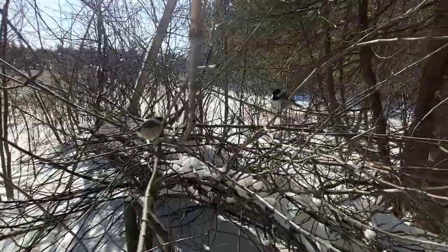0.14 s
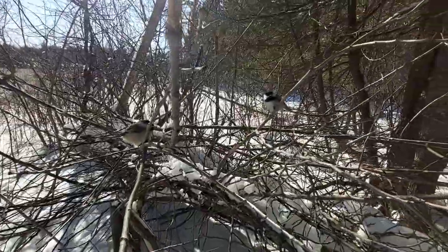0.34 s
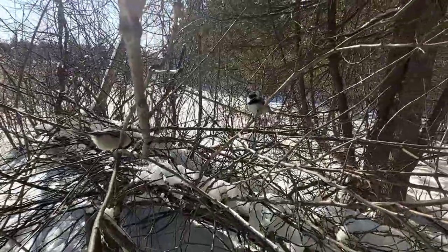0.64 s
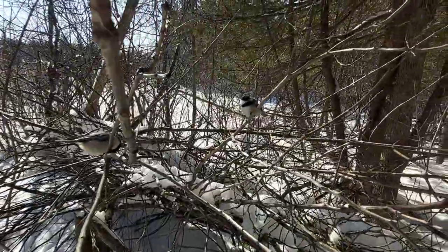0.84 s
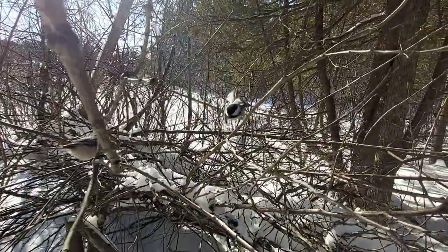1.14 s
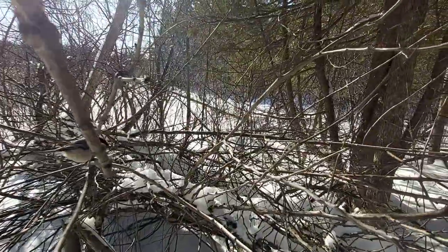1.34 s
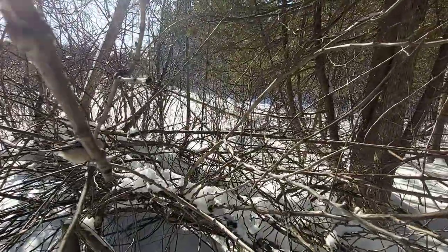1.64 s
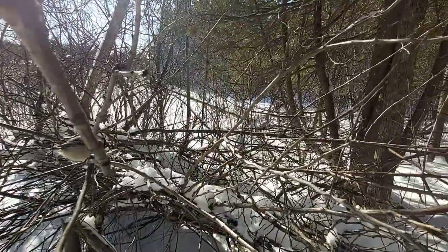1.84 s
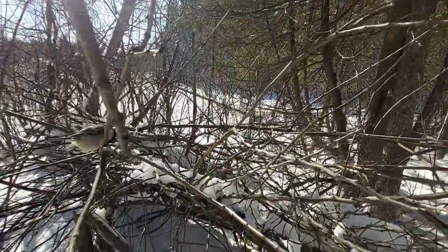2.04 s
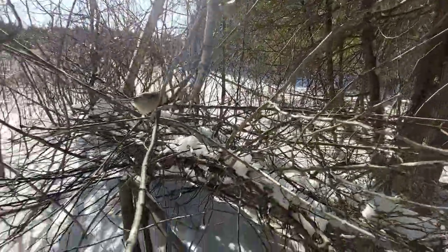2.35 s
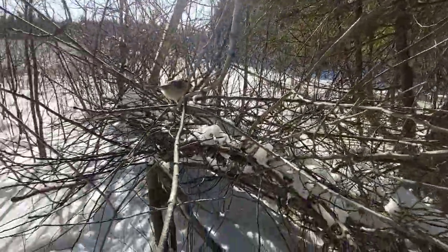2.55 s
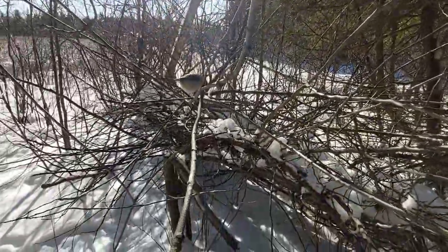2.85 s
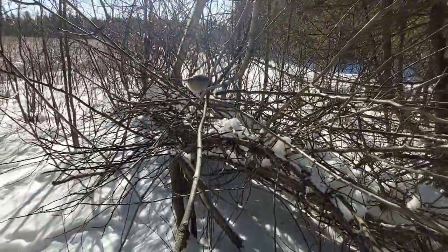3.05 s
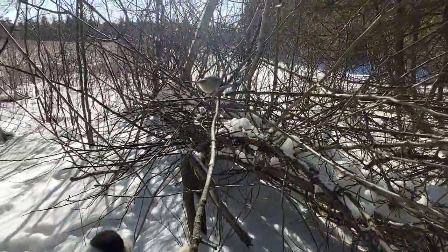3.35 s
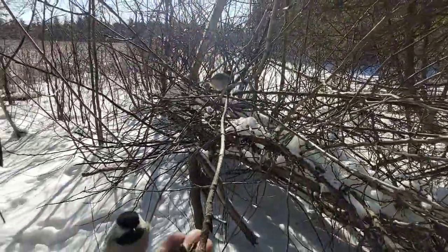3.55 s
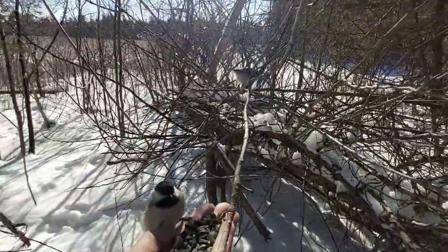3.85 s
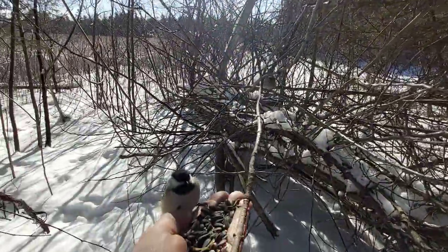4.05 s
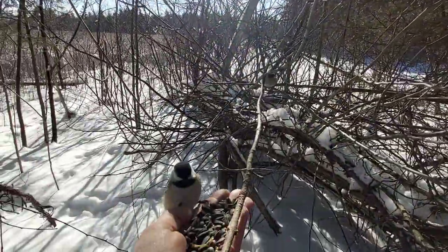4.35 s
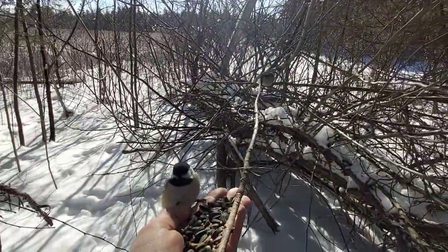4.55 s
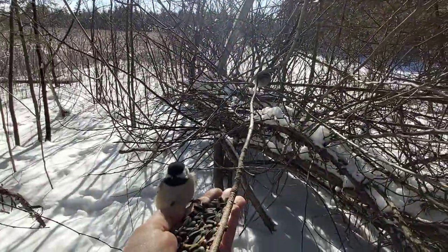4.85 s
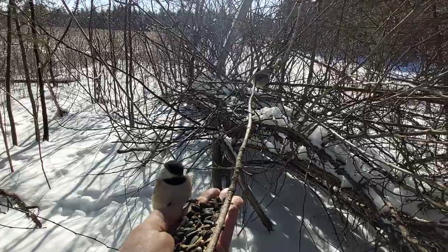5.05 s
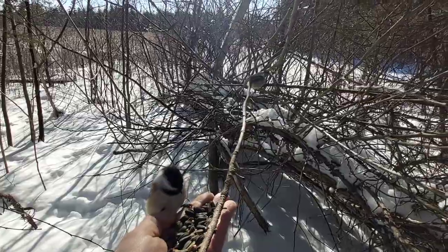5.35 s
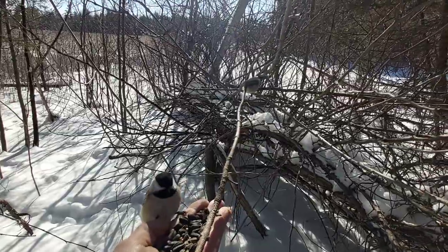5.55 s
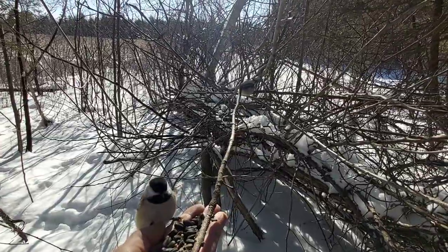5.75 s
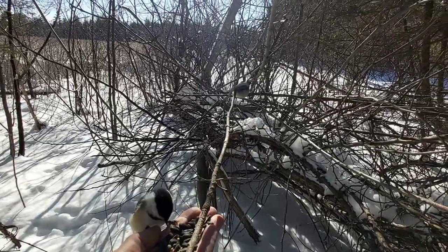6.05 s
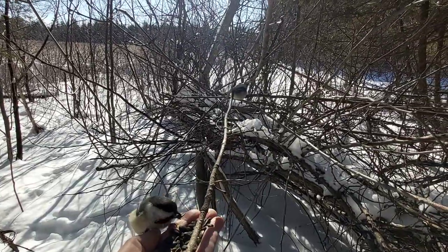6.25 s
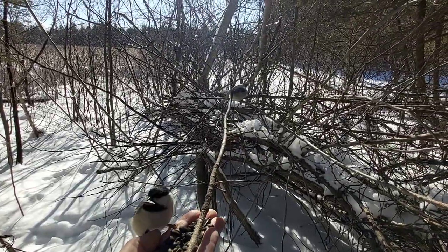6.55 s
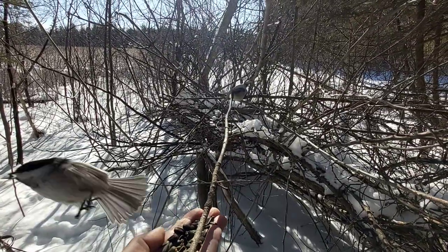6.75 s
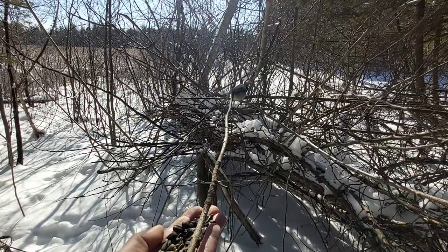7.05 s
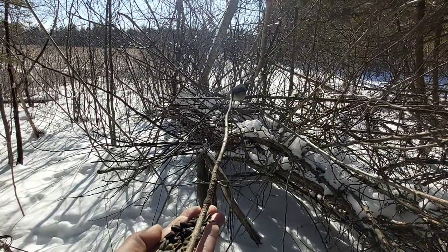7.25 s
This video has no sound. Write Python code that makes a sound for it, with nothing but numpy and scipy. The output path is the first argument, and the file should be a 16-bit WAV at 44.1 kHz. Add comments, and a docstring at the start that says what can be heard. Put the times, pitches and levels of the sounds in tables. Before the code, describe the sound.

Over a faint outdoor hush, small birds chirp sparsely and very high. Wings whisk by with brushy rustling and crackly ticks, ending in a sudden bassy draught thump on the left. Then a short flutter at landing, weak buzzy notes, light clicks among seeds, long near-quiet, and finally a brisk purring burst of wingbeats as the bird takes off. Close stereo handheld microphone, slight echo from trees.

```python
"""Small birds chirp, call and flutter in winter brush around a hand-held two-port microphone.
The voices are gliding whistles and pulsed buzzes; each wingbeat is a damped swing over stirred air.
Twigs, claws and husks tick as short noise bursts, and feathers and brush rustle as grainy hiss.
The draught of one wing thumps into the left port as a chirped ring.
Behind it all lies the far hush of a snowy wood, in slowly swelling noise."""
import sys
import numpy as np
from scipy import signal
from scipy.fft import rfft, irfft
from scipy.io import wavfile
from scipy.ndimage import uniform_filter1d

SR = 44100
rng = np.random.default_rng(int(sys.argv[2]) if len(sys.argv) > 2 else 0)


def digitize_waveform(pressure):
    """Quantize a signal to 16-bit integers and store it at the path in sys.argv[1].

    Rows of a 2-D input are taken as channels; values are limited to [-1, 1].
    """
    field = np.atleast_2d(pressure).T
    bounded = np.clip(field, -1, 1)
    quanta = np.round(bounded * 32767).astype(np.int16)
    wavfile.write(sys.argv[1], SR, quanta)


N = 325899  # length in samples


def gain_of(db):
    """Amplitude factor of a level in dB."""
    return 10 ** (np.asarray(db) / 20)


def evened(x):
    """Signal scaled to an rms of 1."""
    return x / np.sqrt(np.mean(x ** 2) + 1e-20)


def read_curve(points, hz):
    """Value of a table of (Hz, value) points, interpolated over log frequency."""
    point_hz, value = np.transpose(points)
    return np.interp(np.log(hz + 1), np.log(point_hz + 1), value)


def ramp(hz, lo_hz, hi_hz):
    """Straight climb from 0 at lo_hz to 1 at hi_hz."""
    return np.clip((hz - lo_hz) / (hi_hz - lo_hz), 0, 1)


def swell(share, peak, start_db, end_db):
    """Level in dB that climbs from start_db to 0 at the share peak, then runs to end_db."""
    return np.interp(share, [0, np.clip(peak, .02, .98), 1], [start_db, 0, end_db])


def sides(pan_db):
    """Gains of the two ports for a left-minus-right level, their mean being 1."""
    left = gain_of(pan_db)
    return np.array([2 * left / (1 + left), 2 / (1 + left)])


def add(mix, start_s, sound):
    """Lay a two-port sound into the mix, cut off at the end of the scene."""
    part = mix[:, round(start_s * SR):][:, :sound.shape[1]]
    part += sound[:, :part.shape[1]]


def unfold(rows):
    """Start time and sample-rate columns of a curve table."""
    s, *columns = np.transpose(rows)
    t = np.arange(s[0], s[-1], 1 / SR)
    return s[0], [np.interp(t, s, column) for column in columns]


def noise(colour, lo_hz, hi_hz, lift=lambda hz, t: 0, patchy_db=1., size=256):
    """Two-port noise in drifting patches, rms near 1 from lo_hz to hi_hz; lift(hz, t) colours it in dB."""
    # Likeness of the two ports. Each row: frequency in Hz, share of the left noise in the right (0-1)
    likeness = [(60, 0.7), (300, 0.97), (1400, 0.47), (2500, 0.11), (5000, 0.14), (15000, .1)]
    right_lag_s = 3.5e-4
    hop = size // 4
    frames, hz = N // hop + 5, np.fft.rfftfreq(size, 1 / SR)
    a, b, c, d, patches = rng.standard_normal((frames, len(hz), 5)).T
    patches = uniform_filter1d(patches, size=5, axis=0)  # smooth over frequency
    patches = evened(uniform_filter1d(patches, size=12, axis=1))  # and over time

    same = np.clip(read_curve(likeness, hz), 0, 1)[:, None]
    lag = np.exp(-2j * np.pi * hz * right_lag_s)[:, None]
    left = a + 1j * b
    right = lag * same * left + np.sqrt(1 - same ** 2) * (c + 1j * d)

    shape = gain_of(read_curve(colour, hz))
    shape = shape / np.linalg.norm(shape[(hz >= lo_hz) & (hz < hi_hz)])
    lift_db = lift(hz[:, None], np.arange(frames) * hop / SR)
    spectrum = np.array([left, right]) * shape[:, None] * gain_of(lift_db + patchy_db * patches)
    return signal.istft(spectrum, nperseg=size, noverlap=size - hop)[1][:, :N]


def hush():
    """Far wind in the trees and the hiss of the microphone; the bass swells on its own."""
    # Colour of wind and hiss. Each row: frequency in Hz, spectral level in dB per Hz
    hush_colour = [(15, -53), (25, -23), (118, -1), (288, -0.5), (483, -5), (831, -7), (979, -7),
                   (1320, -17.5), (1730, -24.5), (4730, -36.5), (6380, -27), (7510, -41.5), (11900, -32),
                   (15200, -40.5), (16500, -33)]
    # Slow swelling of the wind. Each row: time in seconds, level in dB, level of the bass in dB
    wind_swell = [(0.0, -67.5, -60), (0.49, -66.5, -67.5), (1.21, -64.5, -65), (1.87, -64, -66),
                  (2.32, -63, -55.5), (2.45, -63, -46.5), (2.65, -69, -65), (2.88, -70.5, -72),
                  (3.33, -68, -68.5), (3.5, -69.5, -70.5), (3.97, -65.5, -65.5), (4.49, -65.5, -69.5),
                  (5.3, -66, -66), (5.6, -65, -60), (6.05, -67, -62.5), (6.4, -63, -57), (6.73, -64, -60),
                  (7.39, -62, -55)]
    s, db, bass_db = np.transpose(wind_swell)

    def lift(hz, t):
        bass = 1 - ramp(hz, 150, 390)
        wind_db = bass * np.interp(t, s, bass_db) + (1 - bass) * np.interp(t, s, db)
        steady = ramp(hz, 1300, 2500)  # the hiss above keeps one level
        return wind_db + (np.mean(db) - wind_db) * steady

    return noise(hush_colour, 200, 1200, lift, patchy_db=1.0, size=1024)


def trees(x):
    """Echoes from trunks and brush: sparse taps of random sign that die away."""
    length, spacing, t60_s = SR // 2, 20, 0.24  # length and spacing in samples
    taps = np.zeros((2, length))
    at = np.arange(60, length - 20, spacing) + rng.integers(0, spacing, (2, (length - 61) // spacing))
    np.put_along_axis(taps, at, rng.choice([-1., 1.], at.shape), 1)
    taps = taps * gain_of(-60 * np.arange(length) / SR / t60_s)
    return signal.fftconvolve(x, taps / np.linalg.norm(taps[0]), axes=1)[:, :N]


def rustle():
    """Feathers and brush hiss in grains a few milliseconds long; the loudest bout rules the colour."""
    # Colour of brushed feathers. Each row: frequency in Hz, spectral level in dB per Hz
    feather_colour = [(530, -36), (900, 1), (1410, -8), (2420, -6.5), (3040, -7), (4150, -3), (5100, -4.5),
                      (6560, -2.5), (7770, -18.5), (14700, -2), (16000, -4.5)]
    # Bouts of rustling. Each row: loudest moment in seconds, level in dB, rise of 20 dB in seconds,
    # fall of 20 dB in seconds, sibilance in dB, treble in dB (both over the level), left minus right in dB
    bouts = [(0.075, -77, .2, .07, -4, -9, -9), (0.26, -89, .3, .15, 1, 4, -9),
             (1.0, -92, .1, .15, -1, 8, -8), (1.16, -80, .07, .14, 5, 9, -7),
             (1.335, -71, .12, .2, 2, -2, -8), (1.4, -64, .04, .06, -7, -6, -8),
             (1.5, -76, .1, .3, -4, -11, -10), (1.67, -79, .06, .1, 2, -3, -8),
             (1.715, -62, .055, .035, -10, -13, -7), (1.77, -80, .05, .3, -2, -4, -9),
             (1.965, -72, .08, .3, 4, 1, -4), (2.09, -71, .2, .1, -3, -7, -4),
             (2.15, -80, .05, .1, 7, 3, -5), (2.2, -72, .04, .07, -2, -9, -10),
             (2.26, -72, .06, .1, -4, -11, -3), (2.315, -63.5, .07, .22, 4, 0, 2),
             (2.42, -66, .1, .045, -2, -6, -2), (2.57, -84, .2, .12, 13, 8, -4),
             (2.69, -86, .04, .15, 6, 5, -6), (2.895, -78, .04, .045, -10, -11, -5.5),
             (2.96, -93, .05, .1, 10, 4, -3), (3.17, -83, .12, .12, 3, 6, -6),
             (3.27, -72, .22, .08, 2, -3, -2), (3.31, -74, .1, .035, 3, -6, 0),
             (3.585, -81, .05, .2, 4, -3, -5), (3.7, -88, .1, .2, 8, 2, -6),
             (3.93, -83, .1, .12, 9, -3, -3), (4.0, -82, .03, .04, 10, 5, -1),
             (4.055, -66, .02, .09, 4, -8, -3), (4.155, -81, .06, .1, 8, 2, -3),
             (4.335, -75, .06, .05, 2, -13, -5), (4.71, -79.5, .04, .09, -2.5, -7, -1.5),
             (4.84, -78.5, .05, .07, -2, -8.5, -1), (4.94, -82, .2, .14, 7, -7, -5),
             (5.09, -67, .02, .11, -2, -8, -8), (5.17, -92, .1, .3, 2, 8, -6),
             (5.39, -88, .05, .1, 21, 20, -6), (5.44, -89, .06, .25, 8, 10, -5.5),
             (6.0, -83, .3, .14, 8, -2, -5), (6.28, -87.5, .05, .12, 10, 6, 0),
             (6.5, -86, .12, .6, 6, -4, 0), (6.7, -85, .25, .1, 7, -2, 4),
             (6.84, -64.5, .075, .2, 2, -1, -4), (7.0, -75, .4, .07, 5, 5, -3),
             (7.25, -91, .1, .12, 2, 4, -5)]
    # Brush between the bouts: level in dB, sibilance in dB, treble in dB, left minus right in dB
    still_brush = (-98, -3, 5, -6)
    at, db, rise, fall, *traits = np.transpose(bouts)[:, :, None]
    s = np.arange(0, N / SR, .002)
    power = gain_of(2 * (db - 20 * np.maximum((at - s) / rise, (s - at) / fall)))
    still = gain_of(2 * still_brush[0])
    total = power.sum(0) + still
    # each trait is averaged over the bouts by their power
    sibilance_db, treble_db, pan_db = [((power * trait).sum(0) + still * still_trait) / total
                                       for trait, still_trait in zip(traits, still_brush[1:])]

    def lift(hz, t):
        middle, high = ramp(hz, 4000, 5000), ramp(hz, 7000, 9000)
        sibilance = np.interp(t, s, sibilance_db)
        treble = np.interp(t, s, treble_db)
        # dull rustles are twigs that rasp near 3 kHz
        twig = np.exp(-((hz - 3150) / 450) ** 2) - .6 * (hz < 2500)
        twig_db = twig * np.clip(-.8 * sibilance, 0, 9)
        return middle * (1 - high) * sibilance + high * treble + twig_db

    t = np.arange(N) / SR
    grains = gain_of(1.6 * evened(uniform_filter1d(rng.standard_normal(N), size=150)))
    hiss = noise(feather_colour, 2300, 3800, lift, patchy_db=3.5) * evened(grains)
    return hiss * np.interp(t, s, np.sqrt(total)) * sides(np.interp(t, s, pan_db))


def ticks():
    """Twigs, claws and husks: a sharp noise crack, then a weaker scrape that fades more slowly."""
    # Contacts in the brush. Each row: start in seconds, level in dB, treble above the middle in dB,
    # low body in dB, left minus right in dB
    contacts = [(1.124, -60, -4, -8, -11), (1.1613, -60, 12.5, -4, -18), (1.3227, -49.5, -13, 6.5, -15),
                (1.3743, -48.5, -6.5, -2, 3), (1.3815, -49, -8, -4, -6), (1.592, -59, -5, -6, -3),
                (1.718, -46.5, -4, -3, -4), (1.925, -43, -24, -17, -10), (1.9758, -46, -8.5, -11, -2.5),
                (2.0917, -47.5, -15, -8, -5), (2.197, -55, -15, 0, -3), (2.259, -49, -19, 3, -7),
                (2.2883, -49, -10, 0, -10), (2.326, -43, -5, -4, -3), (2.366, -48, -4, 9.5, -2),
                (2.3996, -38.5, -8, -2.5, -2.5), (2.5584, -57, -8, -2, -8), (2.606, -56, -8, -6.5, -3),
                (2.6776, -50, -7.5, -20, -5), (2.8784, -60.5, -11, 2.5, -2.5),
                (2.8928, -64.5, -16, -1, -5.5), (3.257, -54, -10.5, -8, -6), (3.3165, -45, -8.5, -11, -5),
                (3.9402, -59, -19.5, -15, -3), (3.9894, -59.5, 2.5, -4, -4.5), (4.0497, -53, -24, -12, -4),
                (4.0799, -47.5, -18.5, -10, 0), (4.145, -56, -19, -7, -7.5), (4.7035, -57.5, -6, -1, -8),
                (4.8254, -58, -7, 3.5, -4.5), (4.9631, -57, -16.5, 1.5, -8),
                (5.0882, -39.5, -2.5, -3, -0.5), (5.4468, -56, 0, -3.5, -2), (6.2657, -46, -10, -21.5, -9),
                (6.4592, -61, -14, 3, -5), (6.6017, -62, -1.5, -6, -7), (6.8254, -46, -20, -5, -20),
                (6.867, -46.5, -9, 6.5, -2), (6.9064, -52, -14, 4, -1.5), (7.263, -63.5, -11, 6, -5)]
    # Common colour of the contacts. Each row: frequency in Hz, spectral level in dB per Hz
    tick_colour = [(350, -33), (600, -5), (2270, -10.5), (3780, -6.5), (4340, -3), (6640, -0.5),
                   (10000, -6), (14500, 1), (16000, -6)]
    crack_t60_s, scrape_t60_s, scrape_db = .016, .067, -24  # scrape level is relative to the crack
    size = 4096
    out, t = np.zeros((2, N)), np.arange(size) / SR
    hz = np.fft.rfftfreq(size, 1 / SR)
    crack = gain_of(-60 * t / crack_t60_s)
    scrape = gain_of(scrape_db - 60 * t / scrape_t60_s)
    shape = (1 - np.exp(-t / .0004)) * (crack + scrape)
    for s, db, treble_db, body_db, pan_db in contacts:
        tilt_db = treble_db * ramp(hz, 4700, 9670) + body_db * (1 - ramp(hz, 2930, 3782))
        colour = gain_of(read_curve(tick_colour, hz) + tilt_db)
        colour = colour / np.linalg.norm(colour[(hz > 3000) & (hz < 7500)])
        raw = irfft(rfft(rng.standard_normal((2, size))) * colour) * np.sqrt(len(hz))
        add(out, s, gain_of(db) * raw * shape * sides(pan_db)[:, None])
    return out


def slaps():
    """The draught bulges the left membrane, sucks it out fast, then lets it swing more slowly."""
    # Gusts into the left port. Each row: deepest suction in seconds, level in dB,
    # ring settled on in Hz, length after the suction in seconds
    gusts = [(2.3564, -20, 69.5, 0.011), (2.4188, -2.5, 98, .008), (2.4272, -12.5, 176.7, 0.0041),
             (2.4338, -1.5, 121, 0.022)]
    # Partials of the membrane. Each row: multiple of the ring, level in dB
    membrane_modes = [(1, 0), (2.1, -15), (3.1, -19.5)]
    out, lead = np.zeros((2, N)), .004  # seconds ahead of the suction
    for s, db, ring_hz, length in gusts:
        t = np.arange(-lead, length, 1 / SR)
        hz = ring_hz + 110 * np.exp(-(np.maximum(t + 0.0014, 0) / 0.0034) ** 2)
        turn = 2 * np.pi * np.cumsum(hz) / SR
        turn = turn - turn[round(lead * SR)]  # phase zero at the suction
        swing = sum(gain_of(mode_db) * np.cos(k * turn) for k, mode_db in membrane_modes)
        fade = np.clip((t + lead) / 0.0054, 0, 1) * np.clip((length - t) / 0.0062, 0, 1)
        shape = np.sin(np.pi / 2 * fade) ** 2 * gain_of(-230 * np.maximum(t, 0))  # loses 230 dB/s
        add(out, s - lead, -gain_of(db) * swing * shape * gain_of([[0], [-40]]))  # right 40 dB down
    return out


def wingbeats():
    """Each downstroke pushes, pulls hard and flutters out, with a softer upstroke behind it."""
    # Downstrokes of a near wing. Each row: time in seconds, level in dB, pitch in Hz,
    # left minus right in dB
    downstrokes = [(0.869, -57, 78, -20), (1.333, -49, 130, 14), (1.35, -45.5, 69, 14),
                   (1.379, -49, 117, 11), (1.402, -51.5, 90.5, 12), (1.97, -60.5, 62, 11),
                   (3.153, -57, 170, 1), (3.2018, -49.5, 180, 7), (3.219, -54, 181, 5),
                   (3.2475, -40, 137, 12), (3.266, -46, 170, 12), (3.294, -53.5, 189.6, 12),
                   (3.919, -67, 66, 19), (4.088, -54, 76.5, -26), (6.809, -41.5, 89.5, 20),
                   (6.824, -39.5, 215, 4), (6.856, -36.5, 175, 7), (6.8654, -35, 196, 4),
                   (6.897, -33.5, 214, 4), (6.906, -37, 260, 4), (6.936, -36, 224, 3), (6.945, -43, 260, 3),
                   (6.976, -39, 224, -2.5), (6.985, -45, 260, 0), (7.016, -41, 238, 2),
                   (7.024, -45, 270, 2), (7.053, -50, 230, 2)]
    out, t = np.zeros((2, N)), np.arange(3000) / SR
    after = t - .023  # seconds from the middle of the upstroke
    upstroke = .4 * np.cos(2 * np.pi * 75 * after) * np.exp(-(after / .008) ** 2)
    for s, db, hz, pan_db in downstrokes:
        u = t * hz - .8  # cycles
        decay = np.where(u < .2, ((u - .2) / 0.46) ** 2, (u - .2) / .5)
        stroke = -np.sin(2 * np.pi * u) * np.exp(-decay)
        beat = (stroke + upstroke) / abs(stroke).max()
        add(out, s - .002, gain_of(db) * beat * sides(pan_db)[:, None])
    return out


def stirred_air():
    """A flight leaves low, lumpy eddies; gentle air holds mostly the big, slow ones."""
    # Air stirred by each flight, one list a flight. Each row: time in seconds, level in dB,
    # left minus right in dB
    flight_curves = [
        [(1.27, -77, -1), (1.294, -67, 7), (1.35, -58, 5), (1.414, -63, 7.5), (1.47, -93, -1.5)],
        [(2.22, -81.5, -2), (2.315, -36, 12), (2.352, -30, 15), (2.385, -42, 12), (2.394, -60.5, 24.5),
         (2.418, -28, 36), (2.452, -26, 40), (2.478, -33.5, 37.5), (2.502, -31, 30.5), (2.542, -41.5, 22.5),
         (2.618, -52, 23), (2.66, -91, 3.5)],
        [(3.12, -92.5, -3), (3.158, -61, -2), (3.178, -75.5, 6), (3.252, -45, 4), (3.36, -86, 6)],
        [(6.76, -93, 0), (6.796, -57, 9), (6.862, -47, 2), (7.024, -55, 6), (7.062, -78, 5), (7.1, -74, 8)],
    ]
    # Colour of the eddies. Each row: frequency in Hz, spectral level in dB per Hz
    eddy_colour = [(15, -45), (25, -4.5), (97, -4), (238, -15.5), (399, -22.5), (738, -44), (854, -45.5),
                   (1200, -55), (1560, -84.5), (2640, -120)]
    out = np.zeros((2, N))
    throb_db = 3 * np.cos(2 * np.pi * 25 * (np.arange(N) / SR - 6.92))  # eddies come once a wingbeat
    eddies = noise(eddy_colour, 40, 500, patchy_db=5.5, size=1024) * gain_of(throb_db)
    low_pass = signal.butter(2, 120, fs=SR, output="sos")
    slow = signal.sosfiltfilt(low_pass, eddies)
    for rows in flight_curves:
        s, (db, pan_db) = unfold(rows)
        cut = slice(round(s * SR), round(s * SR) + len(db))
        fast_share = np.clip((db + 64) / 55, .36, 1)
        part = slow[:, cut] + fast_share * (eddies - slow)[:, cut]
        add(out, s, gain_of(db) * part * signal.windows.tukey(len(db), .06) * sides(pan_db))
    return out


def dees():
    """Hoarse buzzes: harmonics of an unevenly pulsing syrinx, shaped by throat resonances."""
    # Buzzy dee notes. Each row: start in seconds, length in seconds, level in dB,
    # loudest at share 0-1 of the length, level at the end in dB
    dee_notes = [(3.9, .14, -70.5, .48, -78), (4.11, .16, -73, .3, -86)]
    # Resonances of the throat. Each row: centre in Hz, width in Hz, level in dB
    throat = [(3260, 270, -1), (3720, 450, -1), (4200, 340, -7)]
    pulses_per_s, sag_per_s2 = 412, 85  # the pulse rate sags as the note goes on
    start_db, pan_db = -13, -8.5
    out = np.zeros((2, N))
    for s, length, db, peak, end_db in dee_notes:
        t = np.arange(0, length, 1 / SR)
        wobble = 1 + .021 * evened(uniform_filter1d(rng.standard_normal(8192), size=120))[:len(t)]
        rate = pulses_per_s - sag_per_s2 * t
        turn = 2 * np.pi * np.cumsum(rate * wobble) / SR
        buzz = sum(gain_of(mode_db) / (1 + (2 * (k * rate - mode_hz) / width_hz) ** 2) * np.cos(k * turn)
                   for k in range(5, 13) for mode_hz, width_hz, mode_db in throat)
        level = gain_of(db + swell(t / length, peak, start_db, end_db - db))
        note = level * evened(buzz) * signal.windows.tukey(len(t), .3)
        add(out, s, note * sides(pan_db)[:, None])
    return out


def chirps():
    """Slightly husky whistles with a weak octave, whose pitch climbs to a top and drops at the end."""
    # Whistled chirps. Each row: start in seconds, length in seconds, top in Hz, climb to the top in Hz,
    # time of the climb in seconds, drop at the end in Hz, time of the drop in seconds, level in dB,
    # loudest at share 0-1 of the length, start relative to the level in dB, left minus right in dB
    whistles = [(0.11, .05, 6700, 700, .012, 50, .004, -80, .5, -8, -1),
                (0.95, .048, 7350, 1200, .016, 500, .002, -49.5, .56, -13, 4),
                (1.505, .055, 7850, 550, .006, 100, .004, -74, .1, -3, -8),
                (2.405, .035, 7300, 500, .008, 100, .004, -70, .2, -3, 0),
                (3.53, .07, 7600, 800, .016, 50, .004, -75.5, .45, -5, -1),
                (3.788, .053, 7750, 2500, .012, 3200, .011, -52, .85, -18, -6),
                (5.385, .06, 7600, 2300, .009, 3300, .003, -49.5, .3, -9, 4),
                (5.58, .04, 7500, 700, .008, 100, .004, -80, .1, -3, 6)]
    octave_db, end_db = -29, -11
    out = np.zeros((2, N))
    for s, length, top_hz, climb_hz, climb_s, drop_hz, drop_s, db, peak, start_db, pan_db in whistles:
        t = np.arange(0, length, 1 / SR)
        hz = top_hz - climb_hz * np.exp(-t / climb_s) - drop_hz * np.exp((t - length) / drop_s)
        husk = 1 + 0.15 * evened(uniform_filter1d(rng.standard_normal(4096), size=60))[:len(t)]
        turn = 2 * np.pi * np.cumsum(hz) / SR
        tone = husk * (np.sin(turn) + gain_of(octave_db) * np.sin(2 * turn))
        level = np.sqrt(2) * gain_of(db + swell(t / length, peak, start_db, end_db))
        note = level * tone * signal.windows.tukey(len(t), .09)
        add(out, s, note * sides(pan_db)[:, None])
    return out


def scene():
    """Voices and ticks with their echoes from the trees, over hush, rustle, wings and draught."""
    birds, cracks = dees() + chirps(), ticks()
    echoes = trees(gain_of(-0.5) * birds + gain_of(-15) * cracks)
    wings = wingbeats() + stirred_air()
    return hush() + echoes + rustle() + cracks + slaps() + wings + birds


def record(dry):
    """The microphone's bass cut at 38 Hz, then a steep band limit at 16.05 kHz."""
    bass_cut = signal.butter(3, 38, "high", fs=SR, output="sos")
    band_limit = signal.firwin(511, 16050, window=("kaiser", 9), fs=SR)
    return signal.oaconvolve(signal.sosfilt(bass_cut, dry), band_limit[None], "same")


dry = scene()
out = record(dry)
digitize_waveform(out)
```